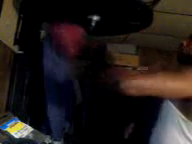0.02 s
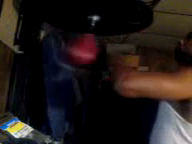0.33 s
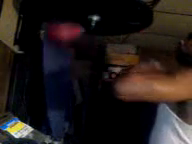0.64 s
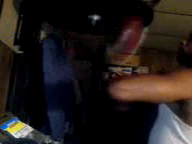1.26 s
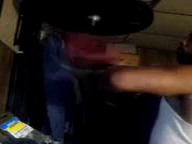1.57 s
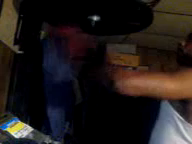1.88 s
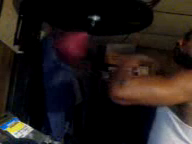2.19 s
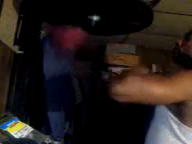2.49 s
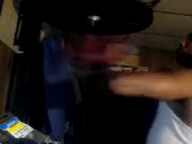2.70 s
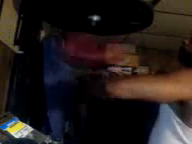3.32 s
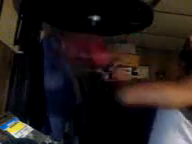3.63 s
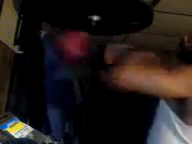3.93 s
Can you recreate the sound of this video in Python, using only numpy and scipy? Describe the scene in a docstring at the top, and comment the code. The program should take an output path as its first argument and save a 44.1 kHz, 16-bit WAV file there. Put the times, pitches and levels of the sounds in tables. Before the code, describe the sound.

A leather speed bag is punched in a fast, steady rhythm, slapping and booming against a wooden platform while its steel swivel clacks. The hardest hits distort on a close, dull-sounding microphone in a small room.

```python
"""A leather speed bag slaps and booms against a round wooden platform in a small room.
Each punch, a dull pop, sends the bag into the board three times: two hard blows, then a light one.
Between blows the steel swivel clacks and chatters in its socket; once it squeals.
The close, narrow-band microphone overloads on hard blows; the hardest clip and crack."""
import sys
import numpy as np
from scipy import signal
from scipy.fft import rfft, irfft
from scipy.io import wavfile
from scipy.ndimage import uniform_filter1d, minimum_filter1d

SR = 44100
rng = np.random.default_rng(int(sys.argv[2]) if len(sys.argv) > 2 else 0)


def to_wav(s):
    """Save 16-bit WAV."""
    ch = np.atleast_2d(s).T  # columns
    pcm = np.round(np.clip(ch, -1, 1) * 32767)  # PCM
    wavfile.write(sys.argv[1], SR, pcm.astype(np.int16))


N = 176400

# fist on bag: t/s, level/dB
FIST_HITS = [(0.328, -10.5), (0.7, -10.5), (1.062, -9), (1.436, -8.5), (1.797, -11), (2.156, -11),
             (2.526, -8.5), (2.888, -9.5), (3.244, -9), (3.604, -7.5), (3.972, -3.5)]
# bag on board: t/s, slap/dB, treble/dB, contact/s, boom/dB before BOOM_GAIN_DB
BOARD_HITS = [(0.0, -6, -4.5, 0.0014, -14.5), (0.091, -5.5, 2.5, 0.014, -25),
              (0.235, -13.5, -4, 0.0137, -27), (0.375, -2.5, -3, 0.015, -12),
              (0.479, -5, -1.9, 0.0074, -22), (0.613, -13, -4.5, 0.014, -24),
              (0.739, 0.5, -2, 0.017, -13.5), (0.843, -4, 2, 0.016, -23), (0.98, -9, -5, 0.004, -23.5),
              (1.106, -5, -2, 0.017, -10.5), (1.212, -5.5, 0, 0.011, -14.5),
              (1.352, -13.5, -8, 0.0099, -28.5), (1.476, 1, -4, 0.016, -15), (1.572, 1.5, 0.5, 0.0075, -17),
              (1.709, -10, -4, 0.0076, -24), (1.837, -6, -5.5, 0.022, -11), (1.939, -5, 2, 0.02, -19),
              (2.075, -8, 2, 0.003, -29.5), (2.199, -6, -2, 0.01438, -14), (2.303, -6, -2.5, 0.0086, -20.5),
              (2.443, -14, 0, 0.0112, -29), (2.573, -2.5, -3, 0.014, -11), (2.665, 1, 1, 0.00988, -12.5),
              (2.804, -13.5, 1, 0.0063, -23), (2.934, -2.5, -4, 0.017, -10.5), (3.025, -7, 1, 0.022, -20),
              (3.162, -9.5, -3.5, 0.00047, -29), (3.288, -1, -5, 0.018, -12), (3.389, -2, 2, 0.0033, -19),
              (3.526, -10, -5, 0.00082, -44), (3.644, -1, -0.5, 0.023, -15),
              (3.74, 0.5, 2.5, 0.00886, -10.5), (3.873, -8.5, -1.5, 0.0036, -25),
              (3.988, 0, -1.3, 0.01, -1.5)]
# swivel on socket: t/s, level/dB, treble/dB, chatter/s
SWIVEL_HITS = [(0.038, -5, -3, 0.0074), (0.151, -18.5, -11, 0.0036), (0.189, -23, 7.5, 0.011),
               (0.309, -18.5, 1.5, 0.0082), (0.34, -7.5, -2, 0.021), (0.426, -5.5, -3, 0.014),
               (0.532, -9.5, -10, 0.012), (0.578, -24, 14, 0.011), (0.68, -17.5, 4, 0.013),
               (0.712, -11, -5, 0.012), (0.793, -6.5, 1.5, 0.012), (0.895, -11, -8.5, 0.016),
               (0.935, -22.5, 5, 0.011), (1.081, -13.5, -6.5, 0.0099), (1.159, -9, -7, 0.0048),
               (1.167, -6.5, 4.5, 0.0045), (1.269, -10.5, -13, 0.0078), (1.304, -26, 21, 0.016),
               (1.372, -20.5, -4.5, 0.019), (1.449, -10.5, -0.1, 0.004), (1.463, -12, -15, 0.008),
               (1.522, -7.5, -5, 0.012), (1.54, -9.5, 3.5, 0.008), (1.626, -7, -6.5, 0.014),
               (1.738, -19.5, 7, 0.0082), (1.782, -20, 1, 0.012), (1.811, -7, -3.5, 0.0089),
               (1.886, -11, -9.5, 0.014), (1.905, -7.5, 1, 0.0079), (1.991, -7, -6, 0.017),
               (2.146, -17.5, -2.5, 0.012), (2.17, -11, -5, 0.011), (2.181, -12, -16, 0.012),
               (2.252, -7.5, -13, 0.0082), (2.267, -9.5, 2.5, 0.0076), (2.364, -8, -11.5, 0.0018),
               (2.4, -24, 12.5, 0.0077), (2.467, -19, -4, 0.016), (2.513, -15, 11, 0.0061),
               (2.535, -15.5, -6, 0.023), (2.558, -5.5, -10, 0.0036), (2.609, -12, -0.5, 0.018),
               (2.632, -9.5, 3, 0.012), (2.721, -6.5, -6, 0.0092), (2.822, -17.5, -6, 0.0074),
               (2.872, -17.5, 0, 0.0073), (2.901, -7, 1.5, 0.0073), (2.916, -12, -12, 0.02),
               (2.979, -7, -16.5, 0.0066), (2.989, -11, 18, 0.0064), (3.077, -4.5, -3, 0.018),
               (3.227, -17.5, -1.5, 0.012), (3.255, -10.5, -6.5, 0.018), (3.34, -5.5, -8, 0.0064),
               (3.344, -10.5, 8, 0.016), (3.442, -5, -7.5, 0.012), (3.549, -17.5, -1, 0.011),
               (3.586, -18.5, 2.5, 0.029), (3.626, -8.5, -15.5, 0.012), (3.695, -6.5, -2.5, 0.019),
               (3.789, -7.5, -8, 0.023), (3.943, -18.5, -5, 0.01)]
# clipping slaps: t/s, peak/dB over full scale
CLIP_PEAKS = [(0.099, .5), (0.761, 1.2), (1.116, 1.5), (1.495, .8), (1.584, 2.4), (1.949, 1.8),
              (2.582, 1.5), (2.674, 2.3), (2.948, .5), (3.04, .9), (3.304, .8), (3.398, 1), (3.663, 1.2),
              (3.751, 1)]
# broad spectra of the struck bodies: f/Hz, level/dB
FIST_COLOUR = [(30, -41.5), (110, -15.5), (220, -17.5), (310, -0.5), (420, 0), (560, -2.5), (900, -11.5),
               (1800, -12.5), (3500, -13.5)]
LEATHER_COLOUR = [(30, -19), (200, -11.5), (450, 1), (750, -2.5), (1250, 4), (2000, -4), (2600, 2.5),
                  (3400, 5), (6000, -4.5)]
STEEL_COLOUR = [(30, -21), (120, -17.5), (230, -9), (330, -7), (520, 0), (700, -8), (1200, -4), (3300, -4),
                (6000, -10.5)]
WOOD_COLOUR = [(25, -27), (60, -10), (120, -8.5), (220, -6), (330, -4), (480, -1), (750, -7.5),
               (4000, -54.5)]
# resonances of board, fittings, bag knock, joint: f/Hz, level/dB over the colour, t60/s
BOARD_RINGS = [(310, 15, .09), (414, 16.5, .09)]
FITTING_RINGS = [(1025, 0, .08), (1288, 2, .1), (1418, 4, .11), (1740, -2, .08), (3068, 3, .1),
                 (3310, -3, .09)]
KNOCK_RINGS = [(508, 0, 0.035), (573, 1, 0.036)]
JOINT_RINGS = [(1314, 8, .02), (2500, 3, 0.015), (3120, 5, 0.016)]
# room decay: f/Hz, t60/s
ROOM_T60 = [(80, 0.2), (300, 0.53), (1200, 0.28), (3500, 0.23)]
# microphone response: f/Hz, gain/dB
MIC_RESPONSE = [(20, -1.5), (3380, 2), (3560, -6.5), (3950, -12), (4300, -20), (4650, -37.5), (5200, -71.5)]

SNAP_DB, SNAP_DECAY_S = -17.5, 0.0022
SLAP_RISE_S, SLAP_DECAY_S, BOOM_GAIN_DB = 0.00066, 0.0093, 2.5
CLACK_RISE_SHARE, CLACK_DECAY_S = 0.35, 0.0061


def amp(db):
    """Decibels to gain."""
    return 10 ** (np.asarray(db) / 20)


def lookup(points, hz):
    """Table value, interpolated over log frequency."""
    f, value = np.transpose(points)
    return np.interp(np.log(hz + 1), np.log(f + 1), value)


def add(mix, at_s, sound):
    """Mix a sound in at at_s."""
    part = mix[max(round(at_s * SR), 0):][:len(sound)]
    part += sound[:len(part)]


def at_level(x, db, window=300):
    """Scale a blow so its loudest short-term RMS is db."""
    return x * amp(db) / np.sqrt(uniform_filter1d(x ** 2, window).max() + 1e-20)


def brighten(x, treble_db):
    """Scale the treble: 2-3.7 kHz ends up about treble_db over 0.7-2 kHz."""
    def band(edges_hz, kind):
        sos = signal.butter(4, edges_hz, kind, fs=SR, output="sos")
        return signal.sosfiltfilt(sos, x, padtype=None)
    high, middle = band(2000, "high"), band([700, 2000], "band")
    treble = high - band(3700, "high")
    return x + high * (amp(treble_db) * middle.std() / treble.std() - 1)


def low_pass(x, hz):
    """Steep band limit."""
    return signal.oaconvolve(x, signal.firwin(511, hz, window=("kaiser", 9), fs=SR), "same")


def limit(x, ceiling=0.92, window=100):
    """Fast, smooth peak limiter."""
    gain = minimum_filter1d(ceiling / np.maximum(abs(x), ceiling), 2 * window)
    return x * uniform_filter1d(uniform_filter1d(gain, window), window)


def crack(x, gap_s=0.005, width_s=0.0022, first_share=0.6):
    """Each listed slap surges past full scale twice and is cut flat."""
    t = np.arange(N) / SR
    for at_s, over_db in CLIP_PEAKS:
        for peak_s, share in (at_s - gap_s, first_share), (at_s, 1):
            surge = np.exp(-np.minimum(abs(t - peak_s) / width_s, 10) ** 2)
            peak_gain = amp(share * over_db) / abs(x * surge).max()
            x = x * (1 + surge * (peak_gain - 1))
    return np.clip(x, -1, 1)


def body(colour, rings=(), size=8192):
    """Minimum-phase impulse response: broad colour plus resonances."""
    hz = np.fft.rfftfreq(size, 1 / SR)
    peaks = 1 + sum(amp(db) ** 2 / (1 + ((hz - ring_hz) * 2 * np.pi * t60_s / np.log(1000)) ** 2)
                    for ring_hz, db, t60_s in rings)
    cepstrum = irfft(np.log(amp(lookup(colour, hz)) * np.sqrt(peaks)))
    cepstrum[1:size // 2] *= 2
    cepstrum[size // 2 + 1:] = 0
    return irfft(np.exp(rfft(cepstrum)))


def contact(response, rise_s, hold_s, decay_s, clicks_per_s=1700, grit=0.75, size=8192):
    """A burst of tiny collisions and rubbing rings a body."""
    t = np.arange(size) / SR
    clicks = rng.choice([-1., 1.], size) * (rng.random(size) < clicks_per_s / SR)
    force = clicks * np.sqrt(SR / clicks_per_s) + grit * rng.standard_normal(size)
    envelope = np.minimum(t / rise_s, 1) * np.exp(-np.maximum(t - hold_s, 0) / decay_s)
    return signal.fftconvolve(force * envelope, response)[:size]


def thud(response, rough, push_s=0.00043, decay_s=0.012, size=8192):
    """A heavy, soft-edged push and crumpling leather ring a body."""
    t = np.arange(size) / SR
    push = t * np.exp(-t / push_s)
    crumple = rng.standard_normal(size) * (1 - np.exp(-t / push_s)) * np.exp(-t / decay_s)
    force = 2 * push / push.sum() + rough * crumple / np.linalg.norm(crumple)
    return signal.fftconvolve(force, response)[:size]


def background(level_db=-37.5):
    """Faint, steady low noise."""
    noise = signal.fftconvolve(rng.standard_normal(N), body(WOOD_COLOUR))[:N]
    return amp(level_db) * noise / noise.std()


def room(x, spacing=20, count=1100):
    """Dense reflections off near walls; low mids ring longest."""
    taps = np.zeros(spacing * (count + spacing))
    slots = (np.arange(count) + spacing // 2) * spacing
    taps[slots + rng.integers(0, spacing, count)] = rng.choice([-1., 1.], count)
    hz, t, spectrum = signal.stft(taps, SR, nperseg=256)
    decay = amp(-60 * t / lookup(ROOM_T60, hz)[:, None])
    tail = signal.istft(spectrum * decay, SR, nperseg=256)[1]
    return signal.fftconvolve(x, tail / np.linalg.norm(tail))[:N]


def swinging_room(x, count=5, dwell=2205):
    """The bag moves, so its sound cycles through several reflection patterns."""
    place = np.arange(N) // dwell % count
    return sum(room(x * uniform_filter1d((place == k) * 1., dwell // 2)) for k in range(count))


def limiter_clicks(max_db=-42, rise_s=0.0001):
    """Faint clicks of the recorder's gain control on sudden blows, one per board hit."""
    out, u = np.zeros(N), np.arange(0, 20, 1 / (SR * rise_s))
    for at_s, _, _, contact_s, _ in BOARD_HITS:
        add(out, at_s + contact_s / 2, amp(max_db) * rng.random() * u * np.exp(1 - u))
    return out


def squeal(at_s=3.115, length_s=0.044, hz=1605, level_db=-15.5):
    """One thin squeak, likely the dry joint."""
    out, t = np.zeros(N), np.arange(0, length_s, 1 / SR)
    add(out, at_s, amp(level_db) * np.sin(np.pi * t / length_s) * np.sin(2 * np.pi * hz * t))
    return out


def fist():
    """Knuckles pop dully on the inflated bag."""
    out, bag = np.zeros(N), body(FIST_COLOUR)
    for at_s, db in FIST_HITS:
        add(out, at_s, at_level(thud(bag, rough=1), db))
    return out


def swivel(detune=0.074, ticks_per_s=150, ticks_db=-34.5):
    """The loose steel joint clacks on each swing, detuned by how it sits, and ticks in between."""
    out = np.zeros(N)
    tunings = 1 + detune * rng.standard_normal((len(SWIVEL_HITS), len(JOINT_RINGS)))
    for (at_s, db, treble_db, chatter_s), tuning in zip(SWIVEL_HITS, tunings):
        rings = [(hz * ratio, ring_db, t60_s) for (hz, ring_db, t60_s), ratio in zip(JOINT_RINGS, tuning)]
        joint = body(STEEL_COLOUR, rings + FITTING_RINGS)
        clack = contact(joint, CLACK_RISE_SHARE * chatter_s, chatter_s, CLACK_DECAY_S)
        add(out, at_s, at_level(brighten(clack, treble_db), db))
    impulses = rng.standard_normal(N) * (rng.random(N) < ticks_per_s / SR)
    ticks = signal.fftconvolve(impulses, body(STEEL_COLOUR, FITTING_RINGS))[:N]
    return out + amp(ticks_db) * ticks / ticks.std()


def bag_on_board():
    """Leather snaps, slaps flat and shakes the fittings; the wood booms at full squash."""
    out = np.zeros(N)
    leather = body(LEATHER_COLOUR, KNOCK_RINGS + FITTING_RINGS)
    wood = body(WOOD_COLOUR, BOARD_RINGS)
    for at_s, slap_db, treble_db, contact_s, boom_db in BOARD_HITS:
        snap = contact(leather, 1 / SR, 0, SNAP_DECAY_S)
        slap = contact(leather, SLAP_RISE_S, contact_s, SLAP_DECAY_S)
        boom = thud(wood, rough=0.62)
        add(out, at_s, at_level(brighten(snap, treble_db), SNAP_DB))
        add(out, at_s, at_level(brighten(slap, treble_db), slap_db))
        add(out, at_s + contact_s, at_level(boom, boom_db + BOOM_GAIN_DB, window=600))
    return out


def scene(room_db=-9.5):
    """Fist, board and swivel in the room, over the background."""
    rig = fist() + bag_on_board() + swivel() + squeal()
    return (background() + amp(room_db) * swinging_room(rig) + rig)[None]


def record(dry, overload=0.86, knee=2.4, clean_share=0.23, channel_hz=4150):
    """Narrow-band microphone, soft overload, limiter; then cracks and limiter clicks."""
    hz = np.fft.rfftfreq(2 * N, 1 / SR)
    mic = irfft(rfft(dry[0], 2 * N) * amp(lookup(MIC_RESPONSE, hz)))[:N]
    saturated = mic / (1 + abs(mic / overload) ** knee) ** (1 / knee)
    squashed = clean_share * mic + (1 - clean_share) * saturated
    narrow = irfft(rfft(squashed, 2 * N) / (1 + (hz / channel_hz) ** 16))[:N]
    limited = limit(low_pass(narrow, hz=4750))
    return low_pass(crack(limited) + limiter_clicks(), hz=16000)[None]


dry = scene()
out = record(dry)
to_wav(out)
```